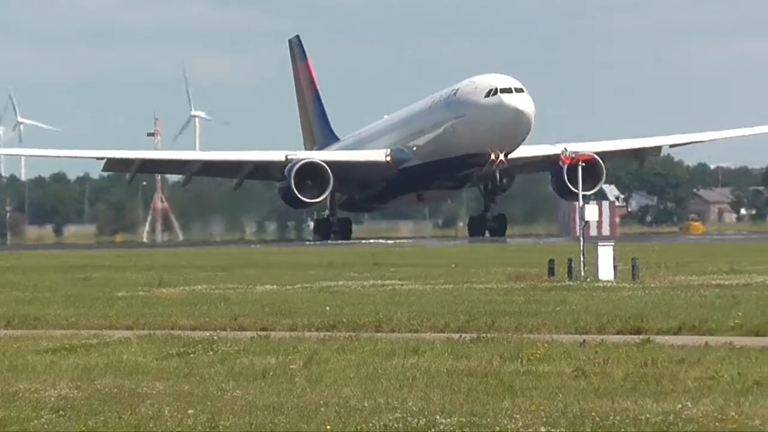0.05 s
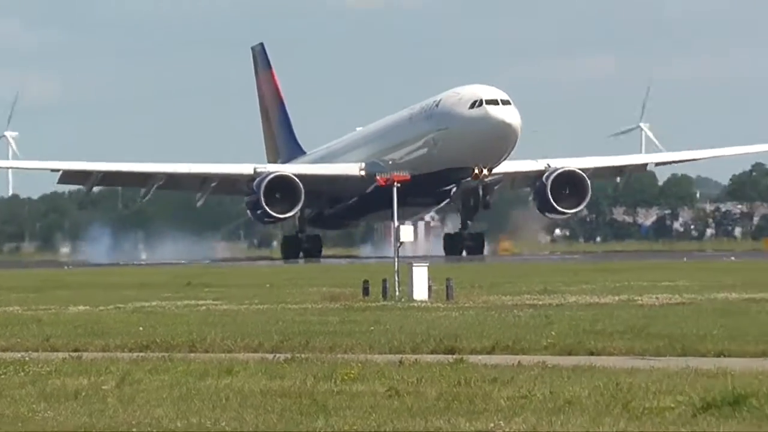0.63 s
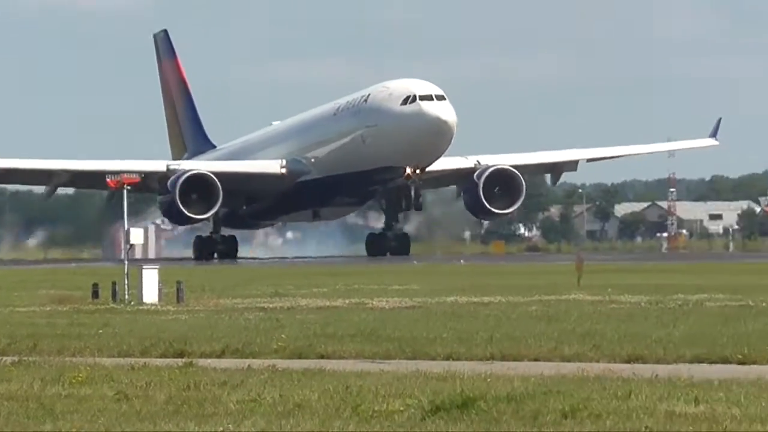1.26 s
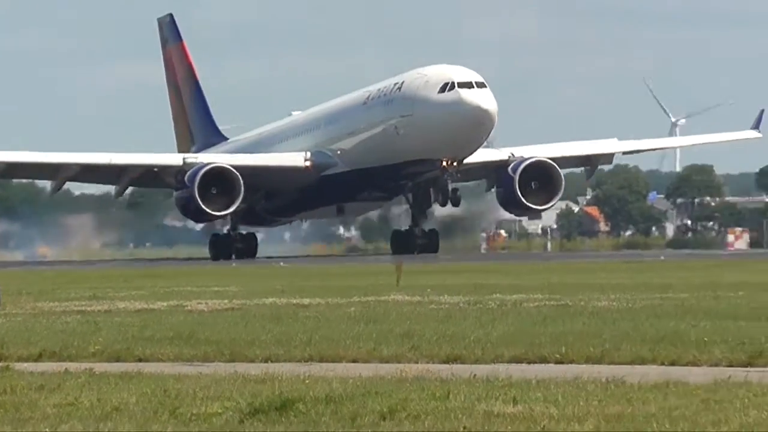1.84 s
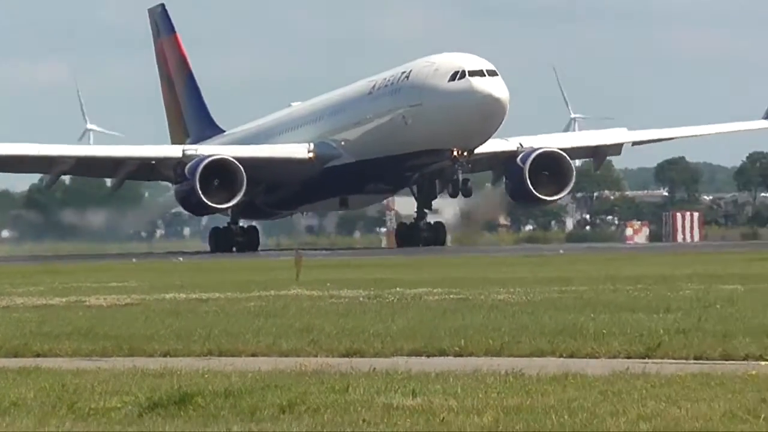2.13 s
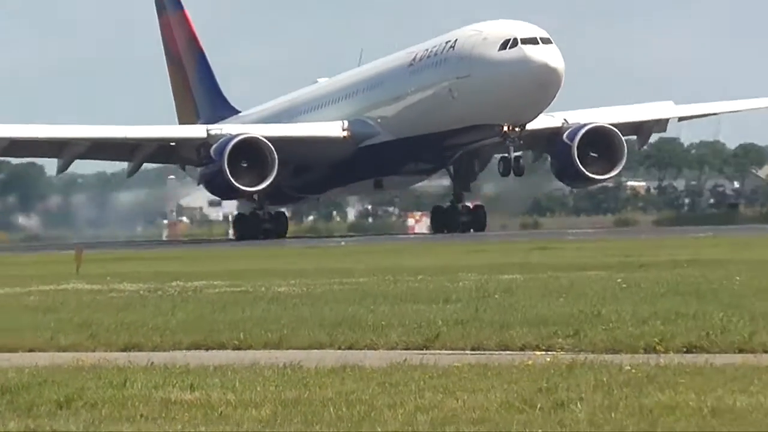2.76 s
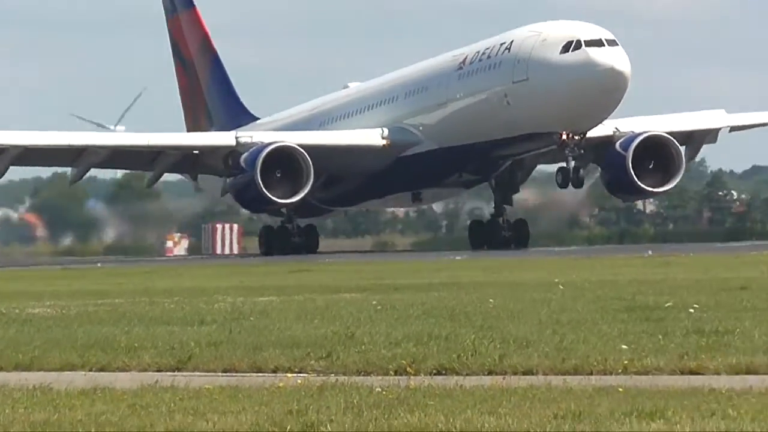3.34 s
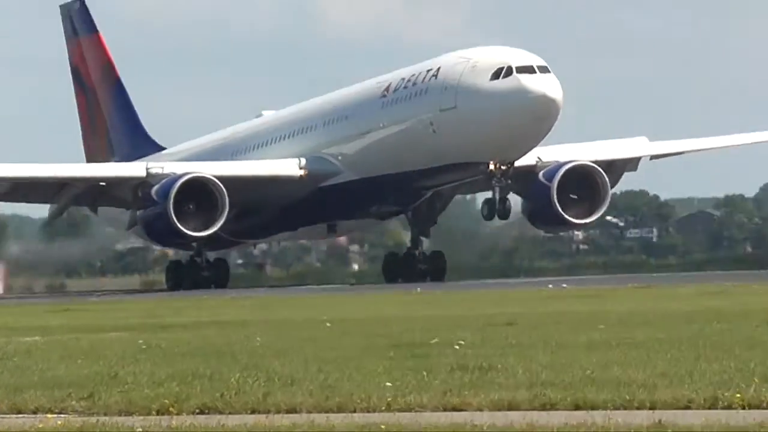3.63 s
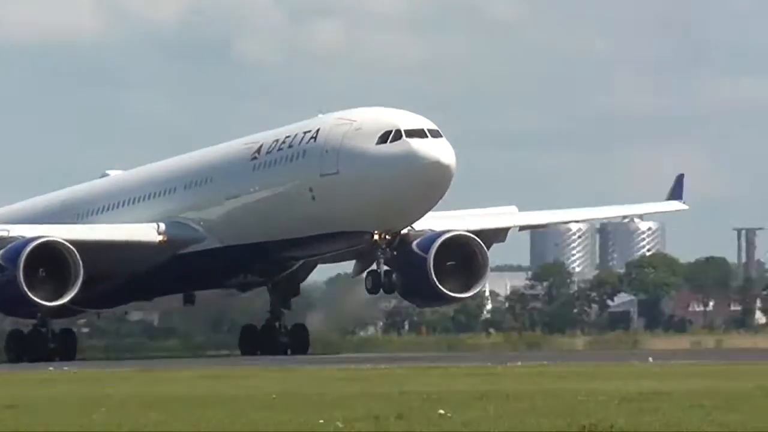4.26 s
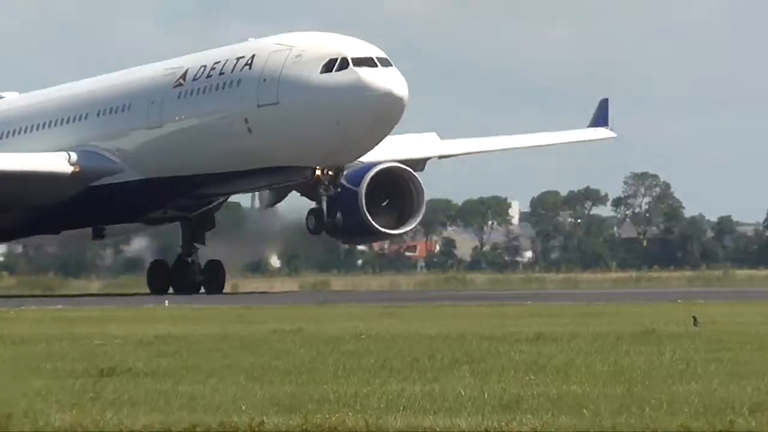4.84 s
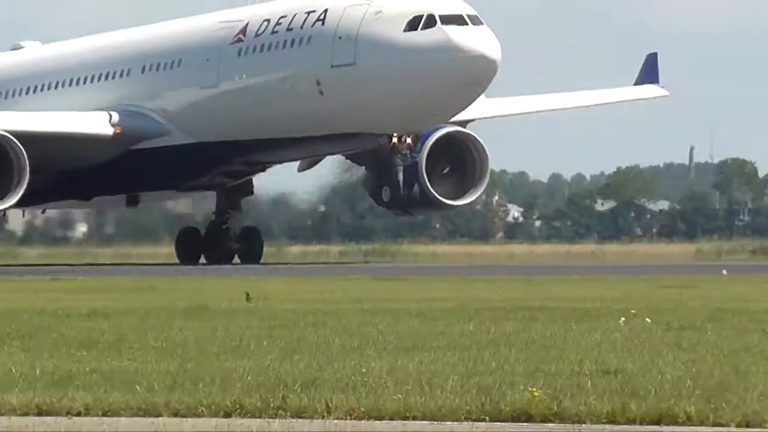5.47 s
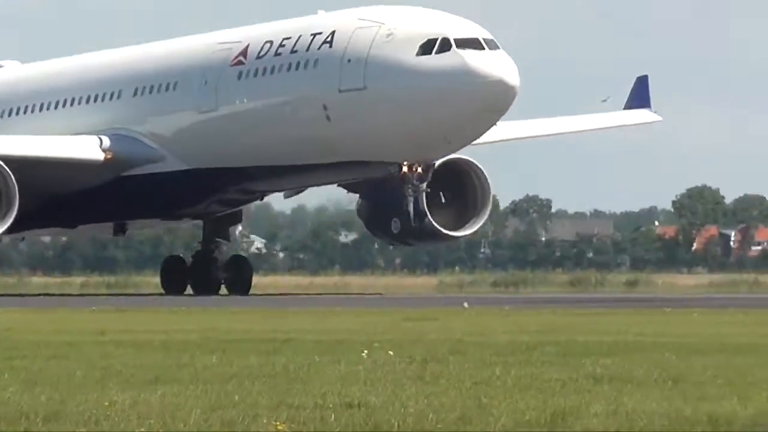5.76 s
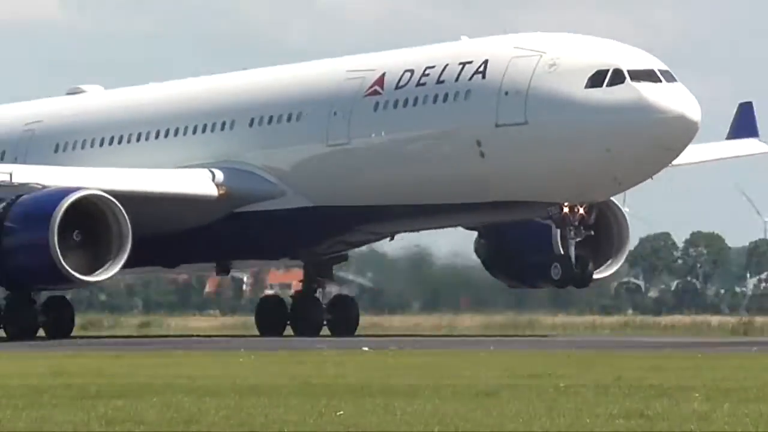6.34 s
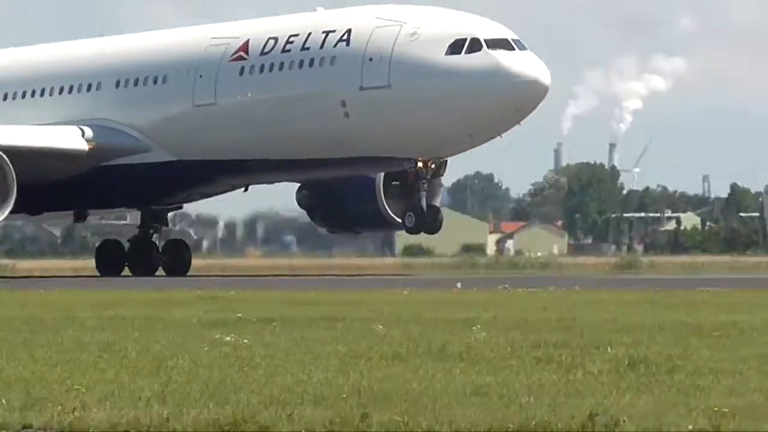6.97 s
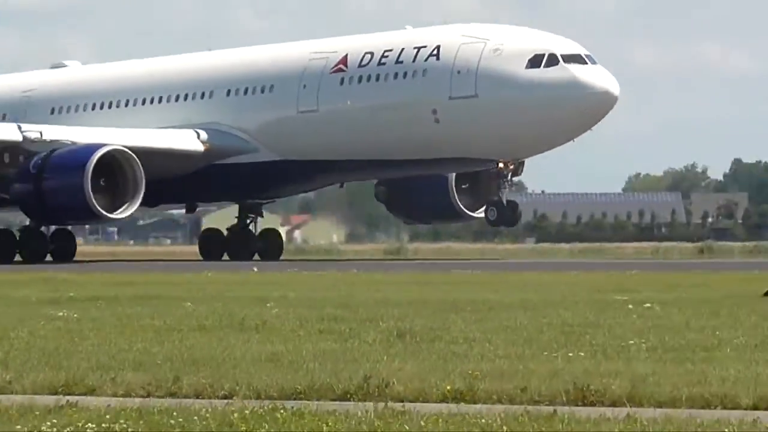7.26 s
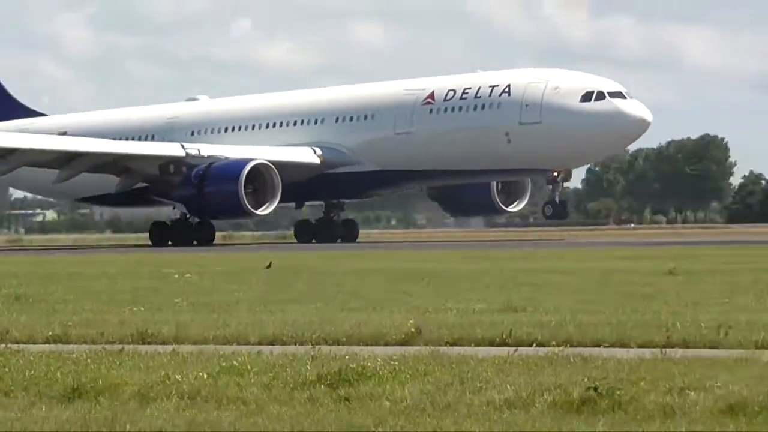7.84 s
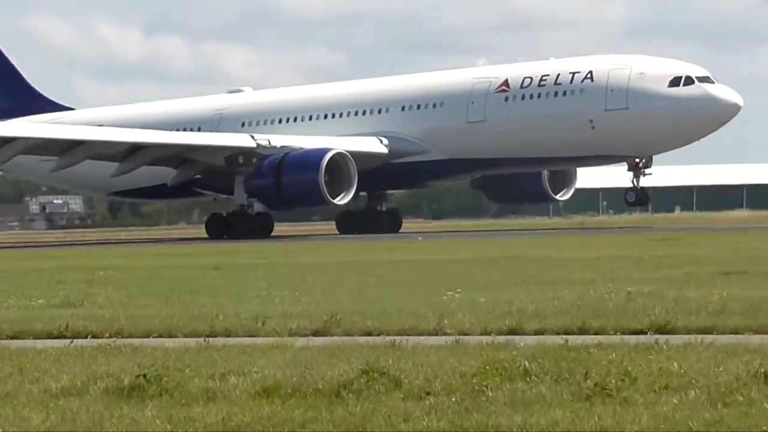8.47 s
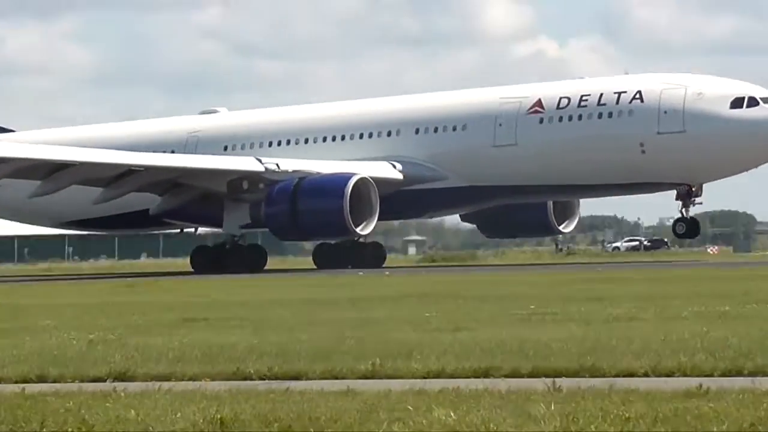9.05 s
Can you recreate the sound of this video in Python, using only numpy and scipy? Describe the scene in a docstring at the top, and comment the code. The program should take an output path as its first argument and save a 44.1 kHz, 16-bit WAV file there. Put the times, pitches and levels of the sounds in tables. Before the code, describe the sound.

A jet airliner, just landed, rolls towards the listener with a wavering engine whine over a low rumble. A small bird chirps twice faintly at the start, and a light breeze puffs on the microphone. Past halfway the whine rises in pitch and reverse thrust swells into a loud, deep roar with a bright hiss. The whine sinks as the aircraft draws level, out in the open beside a runway.

```python
"""Jet engines whine over a low rumble as a twin-engine airliner, just landed, rolls towards the listener.
A small bird chirps twice at the start; a light breeze puffs on the microphone and stirs the grass.
Fan and compressor blades radiate tones, which rise as the shafts spool up after five seconds; reverse
thrust then swells the turbulent exhaust into a deep roar and a bright hiss, with three faint high ticks.
One straight path sets spreading, air absorption and Doppler shift; gusts and the ground colour the sound."""
import sys
import numpy as np
from scipy import signal
from scipy.fft import rfft, irfft, next_fast_len
from scipy.io import wavfile
from scipy.ndimage import uniform_filter1d, map_coordinates

SR = 44100
rng = np.random.default_rng(int(sys.argv[2]) if len(sys.argv) > 2 else 0)


def to_wav(s):
    """Save 16-bit WAV."""
    ch = np.atleast_2d(s).T  # columns
    pcm = np.round(np.clip(ch, -1, 1) * 32767)  # PCM
    wavfile.write(sys.argv[1], SR, pcm.astype(np.int16))


N = 401751
TIME = np.arange(N) / SR
SPEED_M_PER_S, OFFSET_M, ABEAM_S = 56, 148, 8.64  # the aircraft draws level, OFFSET_M away, at ABEAM_S
REFERENCE_M, SOUND_M_PER_S = 300, 343
DOORS_OPEN_S, THRUST_BUILDS_S = (6.24, 6.56), (5.85, 7.47)  # reverse thrust: start, end


def amp(db):
    """Amplitude ratio of a level in decibels."""
    return np.exp(np.asarray(db) * (np.log(10) / 20))


def unit(x):
    """Normalisation to rms 1."""
    return x / np.sqrt(np.mean(x ** 2) + 1e-20)


def steadied(x, seconds=0.16):
    """Division by the running rms, which leaves only the quick flutter."""
    power = np.abs(uniform_filter1d(x ** 2, size=int(seconds * SR)))
    return x / np.sqrt(power + 1e-12)


def along(points, hz):
    """Interpolation of a table's levels on a logarithmic frequency axis."""
    f, *columns = np.transpose(points)
    return np.squeeze([np.interp(np.log(hz + 1), np.log(f + 1), column) for column in columns])


def ramp(x, start, end):
    """A cubic step from 0 to 1."""
    u = np.clip((x - start) / (end - start), 0, 1)
    return u * u * (3 - 2 * u)


def bump(x, centre, width):
    """A smooth pulse of height 1, its width taken at half height."""
    return 1 - ramp(np.abs(x - centre), 0, width)


def wobble(rate):
    """Slow noise: a spline through rate random knots a second."""
    knots = rng.standard_normal(int(N * rate / SR) + 4)
    coarse = TIME[::16]
    return np.interp(TIME, coarse, map_coordinates(knots, [coarse * rate]))


def filtered(x, response):
    """Linear filtering: the spectrum of x times a frequency response."""
    size = next_fast_len(N + SR // 4)
    return irfft(rfft(x, size) * response(np.fft.rfftfreq(size, 1 / SR)), size)[..., :N]


def roll(t=TIME):
    """A moving source at retarded time: distance/m, angle off the nose/degrees and Doppler factor."""
    mach = SPEED_M_PER_S / SOUND_M_PER_S
    x = SPEED_M_PER_S * (t - ABEAM_S)
    metres = (np.sqrt(x ** 2 + (1 - mach ** 2) * OFFSET_M ** 2) - mach * x) / (1 - mach ** 2)
    cosine = mach - x / metres
    return metres, np.degrees(np.arccos(cosine)), 1 / (1 - mach * cosine)


def spreading_db(metres):
    """Spherical spreading: level relative to that at the reference distance."""
    return 20 * np.log10(REFERENCE_M / metres)


def ground(hz, delay_s=0.002055, strength=0.29, fade_hz=2300):
    """Interference of the direct sound with its inverted reflection off grass, which scatters treble."""
    bounce = strength * np.exp(-(hz / fade_hz) ** 4)
    return np.abs(1 - bounce * np.exp(-2j * np.pi * hz * delay_s))


def rush(spectrum, patchy_db, glide=0, air_db_per_m_khz2=.00145):
    """Turbulent noise of rms 1, coloured by air absorption and ground interference."""
    hz, t, noise = signal.stft(rng.standard_normal(N), SR, nperseg=2048)
    metres, _, doppler = roll(t)
    reverse = ramp(t, *THRUST_BUILDS_S)
    # with glide, the peaks sink with the Doppler factor under reverse thrust
    shift = (doppler / roll(THRUST_BUILDS_S[1])[2]) ** (glide * reverse)
    idle_db, reverse_db = along(spectrum, hz[:, None] / shift)
    absorbed_db = air_db_per_m_khz2 * metres * (hz[:, None] / 1000) ** 2
    colour = amp(idle_db * (1 - reverse) + reverse_db * reverse - absorbed_db) * ground(hz)[:, None]
    colour /= np.linalg.norm(colour, axis=0)  # equal power in every frame
    patches = uniform_filter1d(rng.standard_normal(noise.shape), size=24, axis=0)
    patches = unit(uniform_filter1d(patches, size=5, axis=1))
    return unit(signal.istft(noise * colour * amp(patchy_db * patches), nperseg=2048)[1][:N])


def whine(hz, width_hz, fade_db, even=.5):
    """Random modulation of a blade tone of rms 1: uneven inflow broadens the line, gusts make it fade."""
    phase = 2 * np.pi * np.cumsum(hz) / SR
    a, b = wobble(width_hz), wobble(width_hz)
    tone = a * np.cos(phase) + b * np.sin(phase)
    tone /= (np.hypot(a, b) + 1e-6) ** even  # even = 1 leaves phase modulation alone
    return unit(tone * amp(fade_db * wobble(11)))


# Relative spectral densities of the engine noise bands: f/Hz, idle level/dB, reverse level/dB
RUMBLE_SPECTRUM = [(15, -50, -56), (30, -26, -32), (50, -7.5, -15), (73.4, -0.5, -4), (100, 1.5, -1.5),
                   (126, 0, -1.5), (149, 1, 1.5), (189.8, -6.5, -2.5), (239, -17, -13), (327, -36, -36),
                   (600, -80, -77)]
CHURN_SPECTRUM = [(120, -38.5, -40), (198, -2.5, -1.5), (260, 0, .5), (317, -3, -5.5), (400, -4.5, -8),
                  (480, -3, -9.5), (604, -19.5, -19.5), (1000, -70, -69)]
ROAR_SPECTRUM = [(280, -38.5, -43.5), (433, -6, -11), (524, -0.5, -1.5), (660, 0, 2), (790, -1.5, -.5),
                 (960, -3, -4.5), (1150, -14, -14), (2500, -70, -70)]
RASP_SPECTRUM = [(700, -24, -24), (920, -2, -2), (1030, .5, .5), (1230, -.8, -.3), (1400, .3, 0),
                 (1500, -5, -5.5), (1760, -7, -5.5), (2090, -9.5, -10.5), (3000, -27, -28),
                 (6000, -75, -75)]
INTAKE_SPECTRUM = [(1000, -37, -40), (1510, -10, -7), (1716, 0.5, 1.5), (1950, 0, 4), (2370, 0, -1.5),
                   (2620, -5, -4.5), (3000, -11, -10.5), (3600, -24, -24), (6000, -71, -67)]
HISS_SPECTRUM = [(1800, -43, -44), (2790, -14.5, -15), (3200, -10.5, -11), (3780, -6, -7.5),
                 (4400, -3.5, -3.5), (5360, 0, 0), (5940, 0.5, 0), (6600, -4.5, -3), (7300, -9, -7),
                 (8500, -13.5, -11.5), (10000, -19, -17.5), (12000, -26, -30)]
TEARING_SPECTRUM = [(2400, -25, -25), (3500, -2, -2), (4200, 0, 0), (5500, -10, -10), (8000, -40, -40)]
# Slow swells: t/s, upper-band level/dB (scaled for each band), churn level/dB, rumble level/dB
NOISE_SWELLS = [(0, .5, 2, -.5), (.45, -.5, 2.5, .5), (1.2, -1.8, -1.5, -1), (1.9, -1.8, -1, 0),
                (2.7, .8, -1, .3), (3.05, 3, 0, .3), (3.65, 2.3, -.5, -.7), (4.55, 0, 1, 2.2),
                (5.5, -1, -1.5, -.3), (5.75, -.8, 2.5, -1), (6.35, -.8, 0, -.5), (7, 1.8, 1, .5),
                (7.62, 2.8, 1.5, 1.3), (7.85, -2.2, .5, .3), (8.35, -2.5, -1.2, -.8), (8.65, -1.2, 0, 1.3),
                (8.82, 2.8, 2.5, 1.2), (9.11, 2.8, 2.5, -.5)]
# Brief thumps and dips of the rumble: t/s, width/s, level change/dB
RUMBLE_THUMPS = [(4.48, .08, -4), (4.59, .07, 3.5), (6.82, .12, 3), (7.3, .1, -2), (7.6, .1, 2),
                 (7.7, .06, -3), (8.38, .12, -2), (8.52, .07, 4.5), (8.72, .06, -4), (8.97, .06, 2.5)]


def exhaust(sideways_db=2.3, opening_db=0.8):
    """Turbulent mixing: large eddies rumble, smaller ones roar, the finest hiss as reversers turn the jet."""
    metres, angle, _ = roll()
    near_db = spreading_db(metres)
    doors, thrust = ramp(TIME, *DOORS_OPEN_S), ramp(TIME, *THRUST_BUILDS_S)
    times, *columns = np.transpose(NOISE_SWELLS)
    high, middle, low = [np.interp(TIME, times, column) for column in columns]
    low += sum(db * bump(TIME, t, width) for t, width, db in RUMBLE_THUMPS)
    gusts = wobble(11)

    def gain(db, approach, doors_db, thrust_db, swell_db, gust_db=0):
        """Gains add in decibels: idle level, scaled spreading, doors, thrust, swell and gusts."""
        steady_db = db + approach * near_db + doors_db * doors + thrust_db * thrust
        return amp(steady_db + swell_db + gust_db * gusts)

    rumble = gain(db=-32.5, approach=1.66, doors_db=0, thrust_db=4.9, swell_db=low)
    rumble *= steadied(rush(RUMBLE_SPECTRUM, patchy_db=0.45))
    churn = gain(db=-45.2, approach=1.04, doors_db=-2, thrust_db=12, swell_db=middle)
    churn *= rush(CHURN_SPECTRUM, patchy_db=0.8)
    roar = gain(db=-39.7, approach=0.66, doors_db=1.8, thrust_db=3.2, swell_db=1.1 * high, gust_db=0.28)
    roar *= rush(ROAR_SPECTRUM, patchy_db=0.79, glide=1.3)
    rasp = gain(db=-43.2, approach=0.42, doors_db=3.2, thrust_db=1.9, swell_db=.6 * high, gust_db=0.3)
    rasp *= rush(RASP_SPECTRUM, patchy_db=0.8)
    intake = gain(db=-49.5, approach=0.57, doors_db=8, thrust_db=0.4, swell_db=.35 * high, gust_db=0.53)
    intake *= rush(INTAKE_SPECTRUM, patchy_db=0.96)
    hiss = gain(db=-52.9, approach=1.4, doors_db=3.9, thrust_db=2.0, swell_db=.35 * high, gust_db=0.3)
    hiss *= rush(HISS_SPECTRUM, patchy_db=0.94) * amp(sideways_db * ramp(angle, 62, 88))
    # air tears round the doors as they finish opening
    intake *= amp(opening_db * bump(TIME, DOORS_OPEN_S[1], .6))
    tearing = amp(-53) * bump(TIME, DOORS_OPEN_S[1], .26) * rush(TEARING_SPECTRUM, patchy_db=0.9)
    return rumble + churn + roar + rasp + intake + tearing + hiss


# Brief flares and fades of the tones: t/s, width/s, fan level change/dB, booster level change/dB
TONE_SURGES = [(1.52, .1, 6, 1), (1.66, .08, -4, 0), (2.31, .05, 6, 1), (2.4, .08, 6, 0), (2.6, .06, -5, 0),
               (2.98, .07, 8, 0), (3.22, .11, 5, 0), (3.57, .06, 0, 6), (4.98, .08, 4, 0),
               (5.45, .08, 5, 0), (5.7, .16, -2, -3), (5.9, .16, -3, 8.5), (6.06, .08, 6, 1),
               (6.26, .18, -5, -2), (6.93, .08, 6, 0), (7.4, .16, 4, 1), (7.66, .1, 7, 1), (7.8, .12, 0, 5),
               (8.06, .06, 0, 5), (8.2, .055, 0, 9.5), (8.32, .08, 0, 3), (8.62, .08, 0, 4)]


def fans(booster_idle_hz=1815, settle_hz=57, settle_s=.64, rise_hz=410, spool_s=(5.47, 6.98)):
    """Blade-passing tones of each engine's fan and booster, whose shaft settles to idle, then spools up."""
    metres, angle, doppler = roll()
    near_db, spool = spreading_db(metres), ramp(TIME, *spool_s)
    booster_hz = doppler * (booster_idle_hz + settle_hz * np.exp(-TIME / settle_s) + rise_hz * spool)
    fan_hz = (.861 + .005 * spool) * booster_hz
    # directivity: both tones beam forwards and fade once the inlet has turned past
    fan_db = -47.1 + 0.25 * near_db - 1.2 * spool - 6 * ramp(angle, 60, 70)
    booster_db = -53.2 + 1.25 * near_db + .8 * spool - 6.5 * ramp(angle, 74, 90)
    for t, width, fan_surge_db, booster_surge_db in TONE_SURGES:
        surge = bump(TIME, t, width)
        fan_db += fan_surge_db * surge
        booster_db += booster_surge_db * surge
    near = amp(booster_db - 0.9) * whine(booster_hz, width_hz=36, fade_db=1.6, even=.75)
    near += amp(fan_db - 0.8) * whine(fan_hz, width_hz=32, fade_db=1.9, even=.45)
    # the far engine turns slower and is hidden as the aircraft passes
    slower = .979 + .012 * np.sqrt(spool)
    hidden_db = 8 * ramp(TIME, *THRUST_BUILDS_S)
    far = amp(booster_db - 2.5 - hidden_db) * whine(slower * booster_hz, width_hz=20, fade_db=2.0)
    far += amp(fan_db - 7.5 - hidden_db) * whine(slower * fan_hz, width_hz=34, fade_db=1.5)
    # blades cutting turbulence put a broad skirt round the fan tone, and a broader one near its octave
    skirt = amp(fan_db - 4.5 - hidden_db) * whine(.99 * fan_hz, width_hz=170, fade_db=.8)
    octave = amp(fan_db - 16.5 + .6 * near_db) * whine(2.08 * fan_hz, width_hz=420, fade_db=1.0)
    return near + far + skirt + octave


# Further compressor stages, relative to the main tone: frequency ratio, idle level/dB, reverse level/dB
COMPRESSOR_STAGES = [(.665, -9, -14), (.73, -11, -9), (.94, -13, -7), (1.056, -19, -9), (1.126, -20, 0),
                     (1.27, -31, -9)]


def compressors(idle_hz=4978, sag_hz_per_s=14.2, rise_hz=418, spool_s=(5.36, 6.84), air_db_per_m=0.0655):
    """Air absorption swallows the thin, high blade tones of the core until the aircraft comes near."""
    metres, angle, doppler = roll()
    spool, reverse = ramp(TIME, *spool_s), ramp(TIME, *THRUST_BUILDS_S)
    main_hz = doppler * (idle_hz - sag_hz_per_s * TIME + rise_hz * spool)
    lower_hz = (.879 - .021 * spool) * main_hz
    clear_db = air_db_per_m * (REFERENCE_M - metres)
    directivity_db = 2.5 * bump(angle, 20, 6) + 2.5 * ramp(angle, 48, 60) + 3.5 * ramp(angle, 68, 88)
    main_db = -57.3 + clear_db - 7 * np.sqrt(spool) + directivity_db
    lower_db = -62.2 + clear_db - 6 * reverse + 7.5 * bump(angle, 46, 11)
    scattered = .2 + .75 * np.sqrt(spool)

    def stage(hz):
        """Scattering by turbulence moves a share of a line's power into a wider band."""
        line = np.sqrt(1 - scattered) * whine(hz, width_hz=40, fade_db=1.0)
        return line + np.sqrt(scattered) * whine(hz, width_hz=135, fade_db=1.2)

    tones = amp(main_db) * stage(main_hz) + amp(lower_db) * stage(lower_hz)
    for ratio, idle_db, reverse_db in COMPRESSOR_STAGES:
        stage_db = main_db + idle_db + (reverse_db - idle_db) * reverse ** 2
        tones += amp(stage_db) * whine(ratio * main_hz, width_hz=110, fade_db=1.5)
    return tones


# Chirps: onset t/s, duration/s, start f/Hz, end f/Hz, peak level/dB
BIRD_CHIRPS = [(.005, .052, 6100, 4300, -55), (0.264, .095, 6600, 4050, -51)]


def bird():
    """Frequency modulation: each short whistle sweeps down, swelling in the middle."""
    song = np.zeros(N)
    for t, duration, start_hz, end_hz, db in BIRD_CHIRPS:
        progress = np.clip((TIME - t) / duration, 0, 1)
        hz = start_hz + (end_hz - start_hz) * progress + 80 * wobble(300)
        song += amp(db) * np.sin(np.pi * progress) ** 2 * np.sin(2 * np.pi * np.cumsum(hz) / SR)
    return song


# Puffs of breeze: t/s, width/s, level/dB
BREEZE_PUFFS = [(.4, 0.83, -45), (6.15, 0.78, -47.5)]
# Relative spectral density of the buffeting: f/Hz, level/dB
BUFFET_SPECTRUM = [(15, -22), (35, -8.5), (70, 2.5), (120, 1), (200, -11), (350, -16), (800, -37.5),
                   (2000, -80)]


def breeze(calm_db=-64):
    """Turbulent pressure fluctuations buffet each microphone port with its own low, lumpy noise."""
    strength = amp(calm_db) + sum(amp(db) * bump(TIME, t, width) for t, width, db in BREEZE_PUFFS)
    eddies = unit(filtered(rng.standard_normal((2, N)), lambda hz: amp(along(BUFFET_SPECTRUM, hz))))
    return strength * amp(2.5 * wobble(12)) * eddies


# Rustles of grass in the breeze: t/s, width/s, level/dB
GRASS_RUSTLES = [(.35, .25, -74), (.9, .25, -75), (1.7, .3, -75), (4.1, .45, -68.5), (5.2, .3, -76),
                 (5.9, .16, -71)]
# Relative spectral density of the rustling: f/Hz, level/dB
GRASS_SPECTRUM = [(4000, -30), (7000, -4), (9000, 0), (11500, -6)]


def grass(grain_db=3):
    """Rapid amplitude modulation makes treble noise grainy, like grass stirring close to each port."""
    strength = sum(amp(db) * bump(TIME, t, width) for t, width, db in GRASS_RUSTLES)
    blades = rng.standard_normal((2, N)) * amp(grain_db * wobble(120))
    return strength * unit(filtered(blades, lambda hz: amp(along(GRASS_SPECTRUM, hz))))


# Faint ticks above the hiss: t/s, width/s, f/Hz, peak level/dB
HIGH_TICKS = [(7.115, .01, 9500, -60), (7.512, .004, 10700, -53), (8.11, .006, 10500, -57)]


def ticks(jitter_hz=900):
    """Tone bursts with jittering phase, so brief that they are heard as tiny, very high ticks."""
    return sum(amp(db) * bump(TIME, t, width) * np.sin(2 * np.pi * hz * TIME + wobble(jitter_hz))
               for t, width, hz, db in HIGH_TICKS)


# Response of the surroundings, relative to the direct sound: f/Hz, level/dB
ECHO_RESPONSE = [(30, -31), (150, -34.5), (300, -39), (600, -32.5), (900, -12.5), (1180, -27), (1500, -19),
                 (1950, -39), (2500, -36), (3300, -49), (10000, -38)]


def echo(direct, delay_s=.13):
    """Reflection from the surroundings returns a faint, late, coloured copy of the sound."""
    return filtered(direct, lambda hz: amp(along(ECHO_RESPONSE, hz)) * np.exp(-2j * np.pi * hz * delay_s))


def scene():
    """Superposition: the aircraft is alike in both channels, its echo from the side in opposite phase."""
    aircraft = exhaust() + fans() + compressors()
    side = echo(aircraft)
    return np.array([aircraft + side, aircraft - side]) + bird() + ticks() + grass() + breeze()


# Relative spectral density of the microphone's own hiss: f/Hz, level/dB
SELF_NOISE_SPECTRUM = [(4120, -32), (7000, -4), (9590, 0.5), (11300, -3.5), (11800, -7), (15300, -37),
                       (22000, -120)]


def record(dry, low_cut_hz=36, top_hz=11950):
    """Self-noise and band limiting: the microphone adds hiss, thins the deepest bass and cuts the top."""
    hiss = amp(-73.5) * unit(filtered(rng.standard_normal(N), lambda hz: amp(along(SELF_NOISE_SPECTRUM, hz))))
    low_cut = lambda hz: hz ** 3 / np.hypot(hz ** 3, low_cut_hz ** 3)
    return filtered(dry + hiss, lambda hz: low_cut(hz) * (hz < top_hz))


dry = scene()
out = record(dry)
to_wav(out)
```